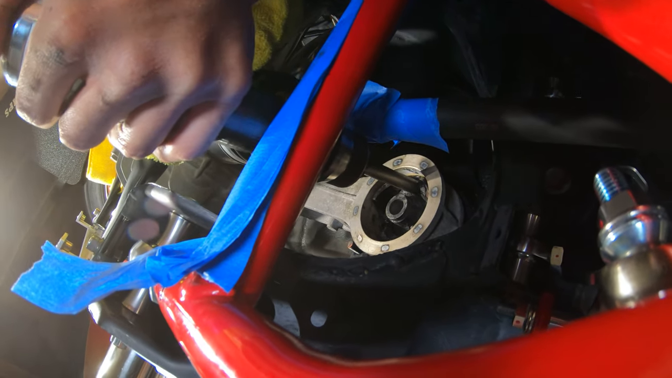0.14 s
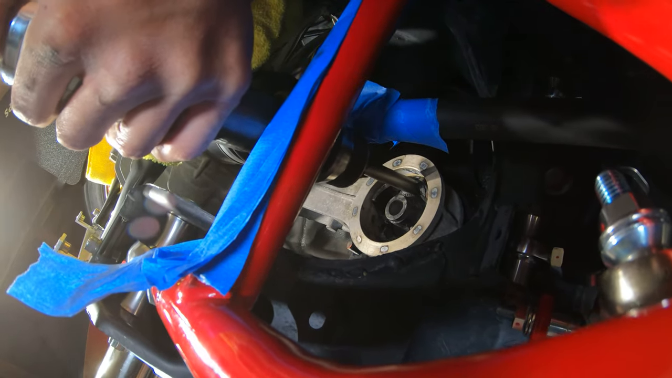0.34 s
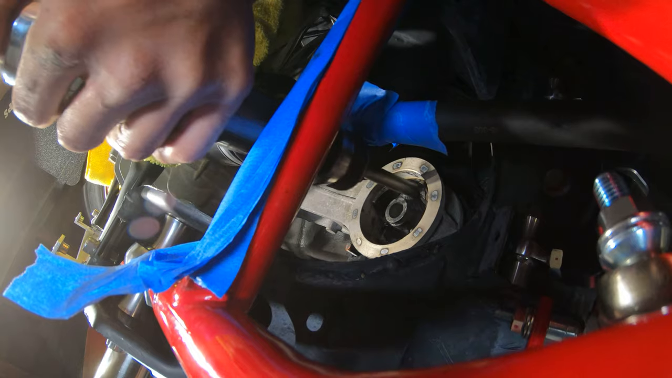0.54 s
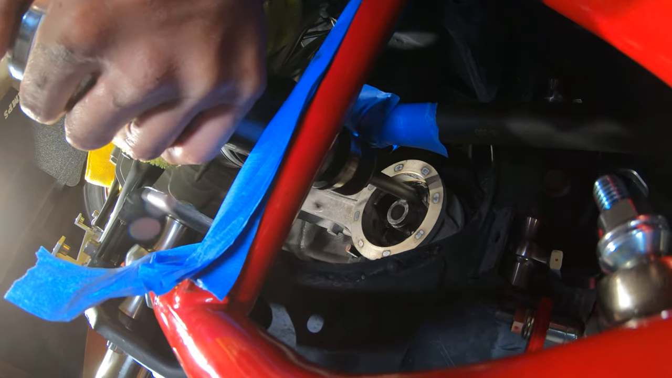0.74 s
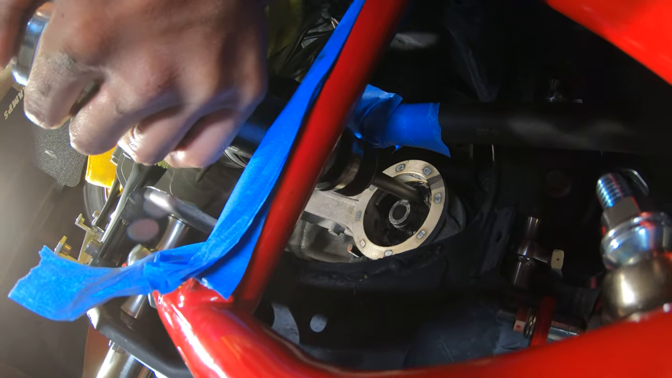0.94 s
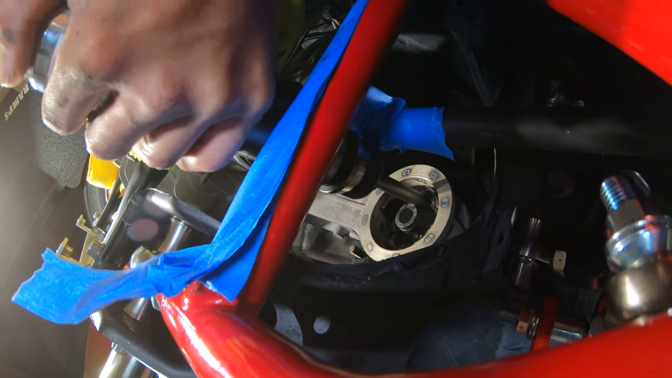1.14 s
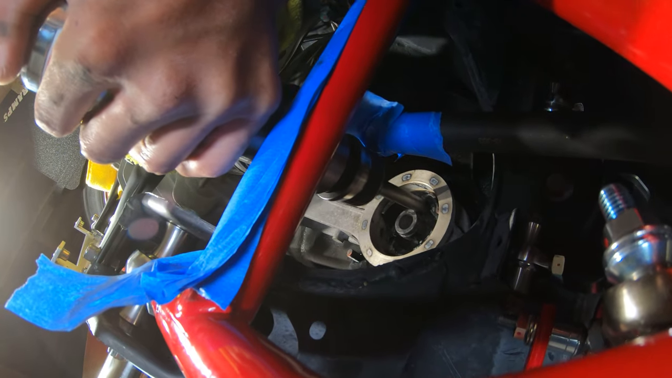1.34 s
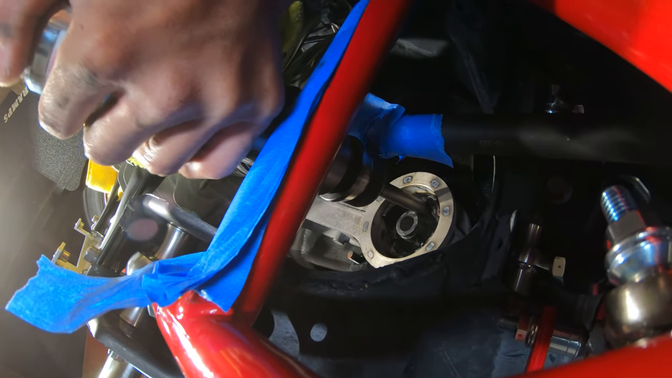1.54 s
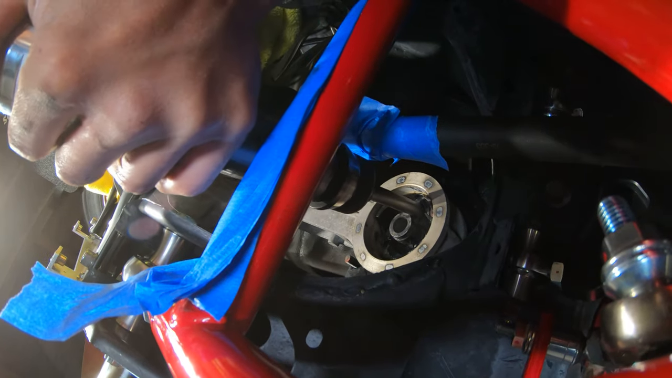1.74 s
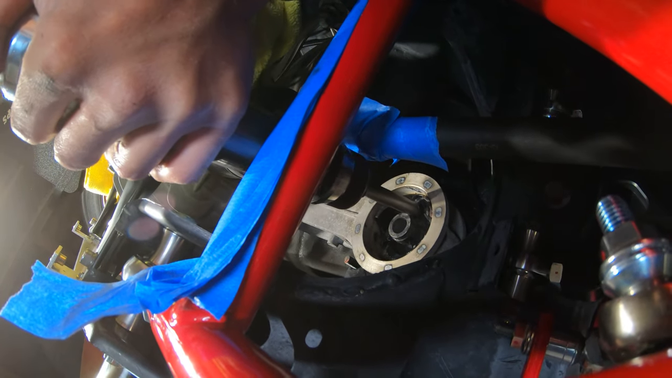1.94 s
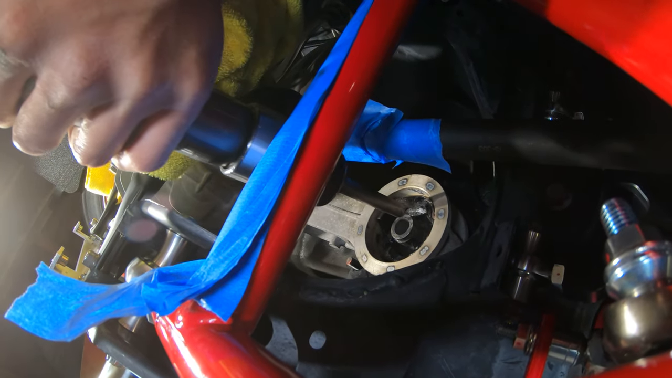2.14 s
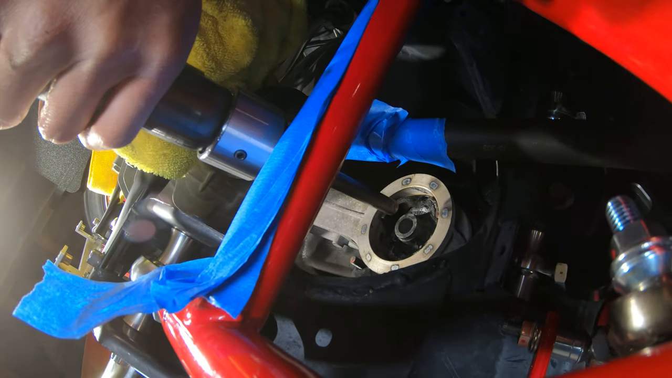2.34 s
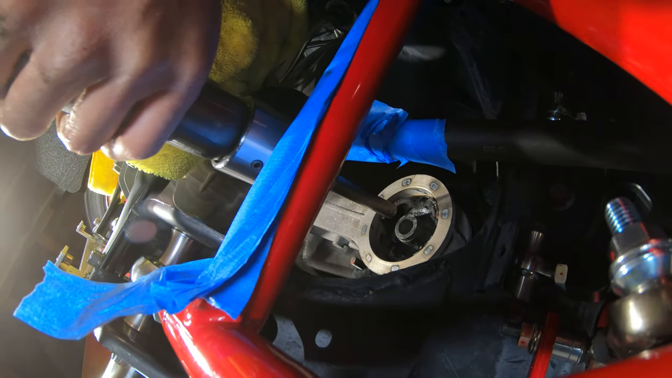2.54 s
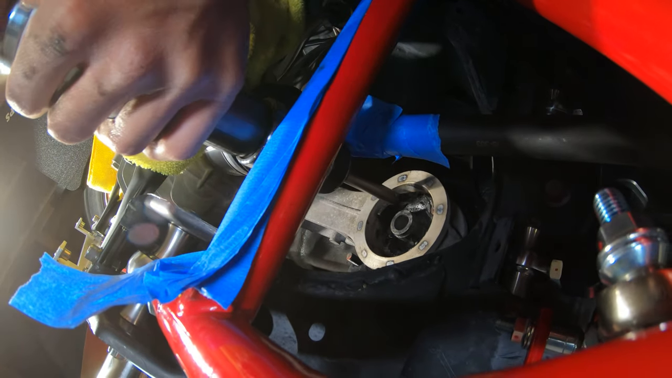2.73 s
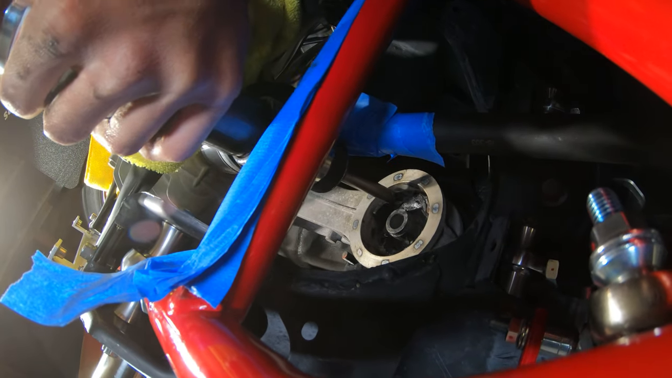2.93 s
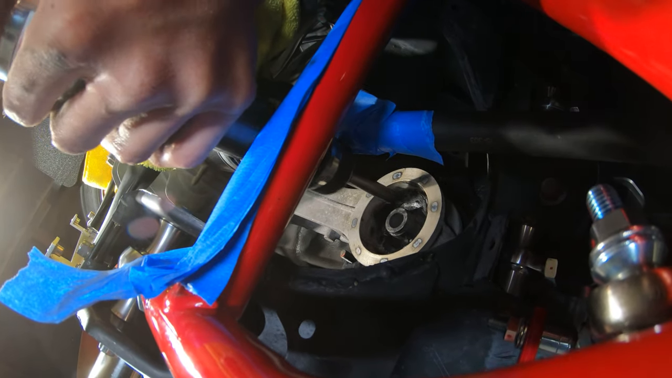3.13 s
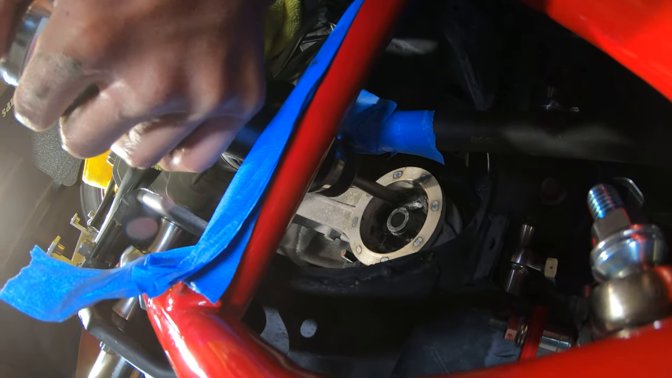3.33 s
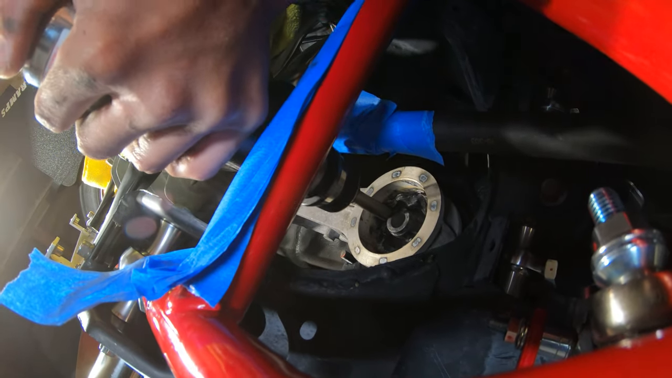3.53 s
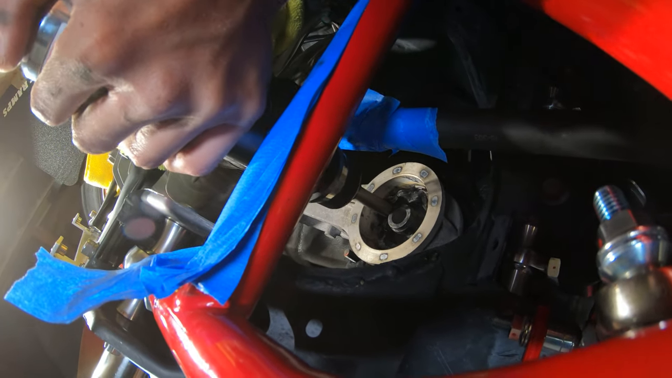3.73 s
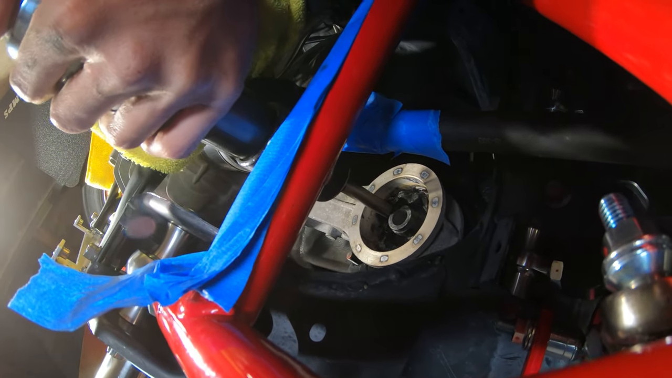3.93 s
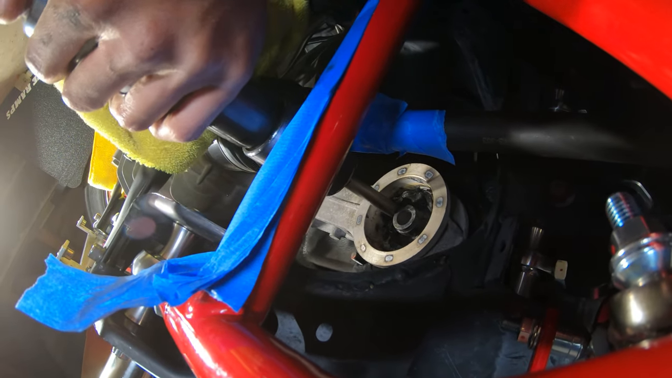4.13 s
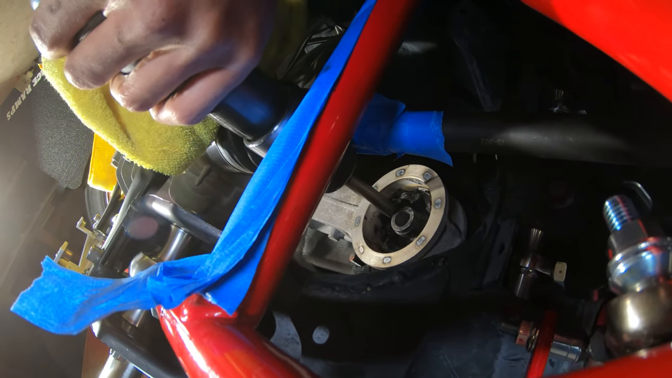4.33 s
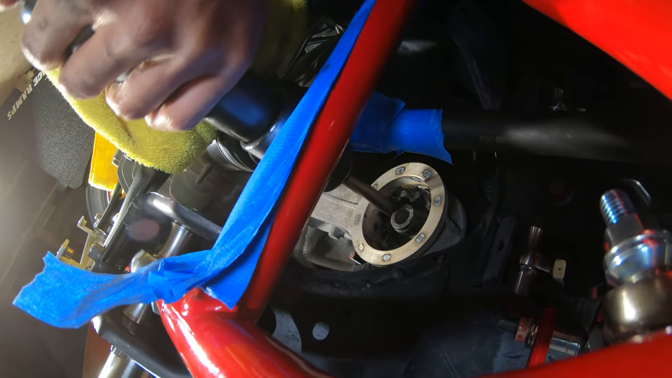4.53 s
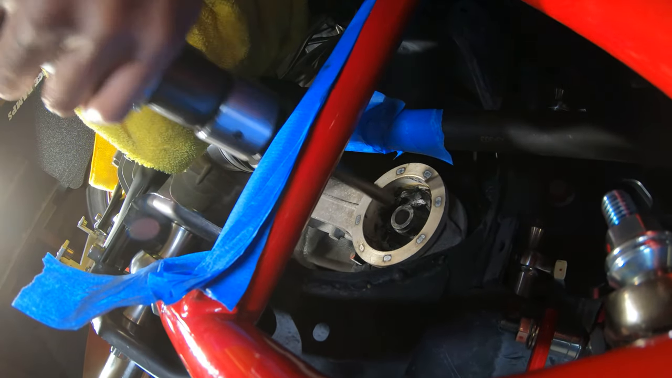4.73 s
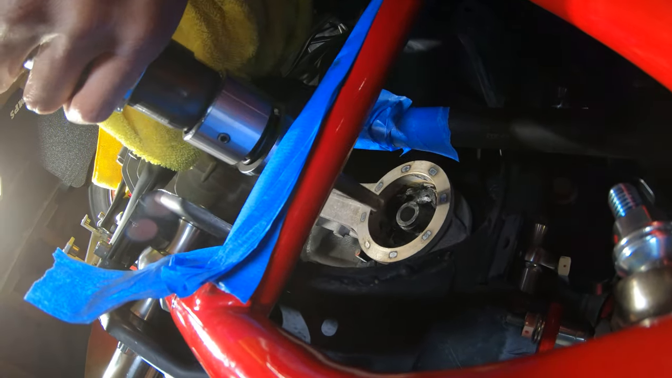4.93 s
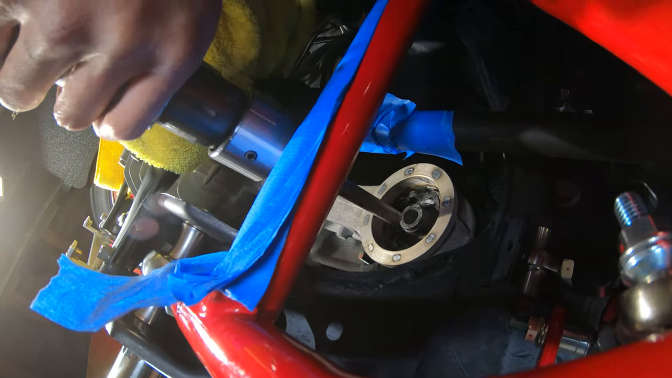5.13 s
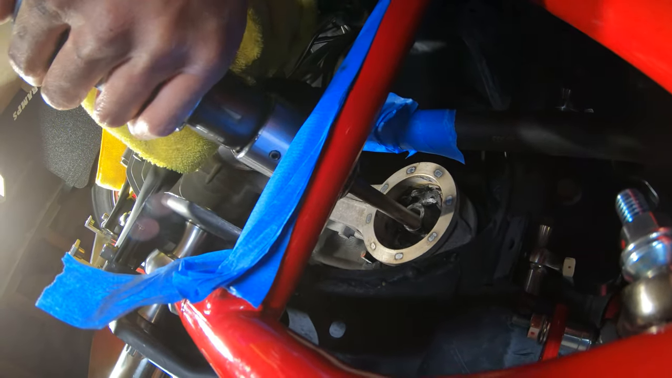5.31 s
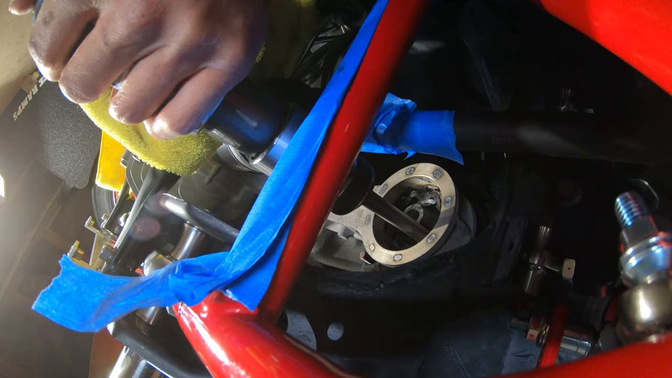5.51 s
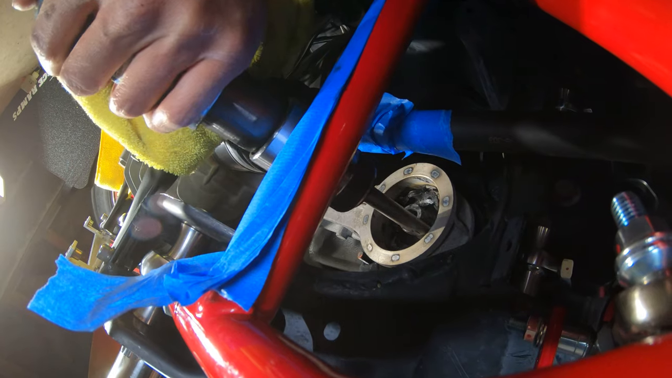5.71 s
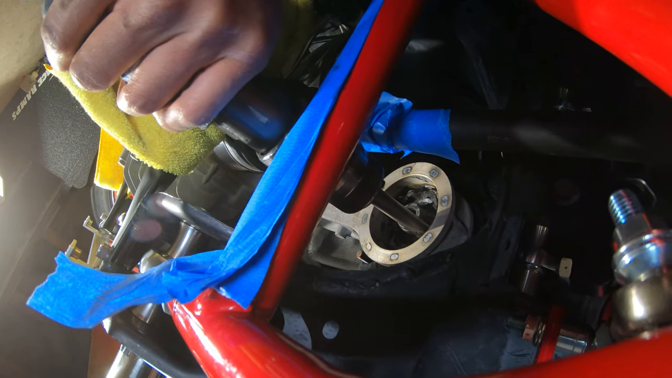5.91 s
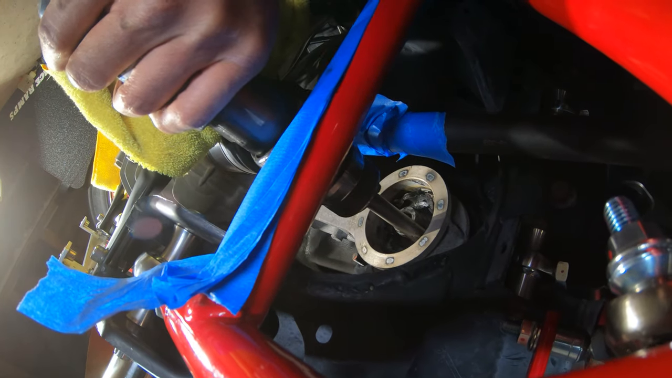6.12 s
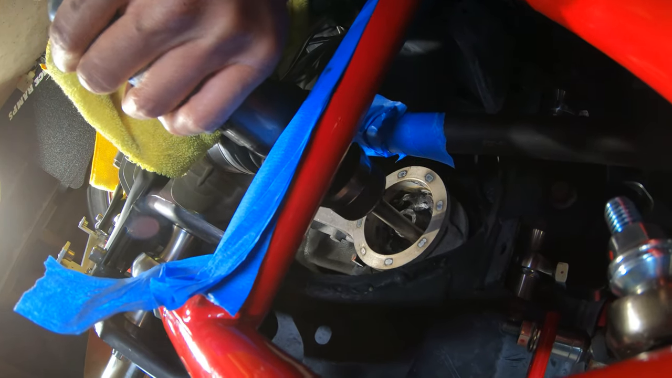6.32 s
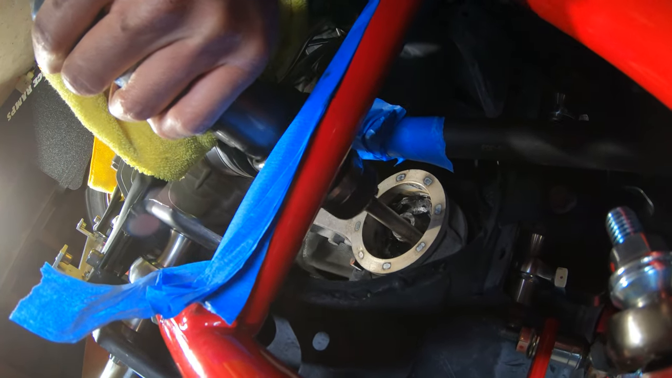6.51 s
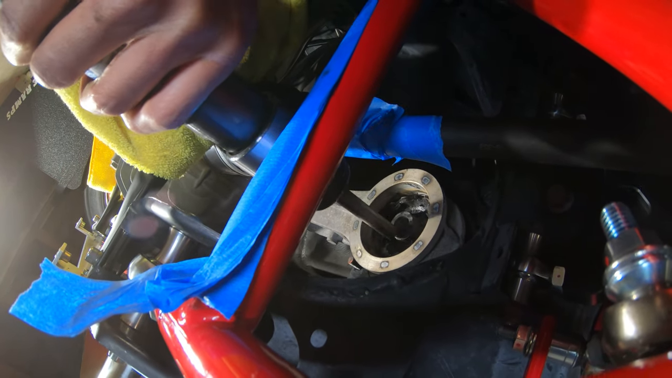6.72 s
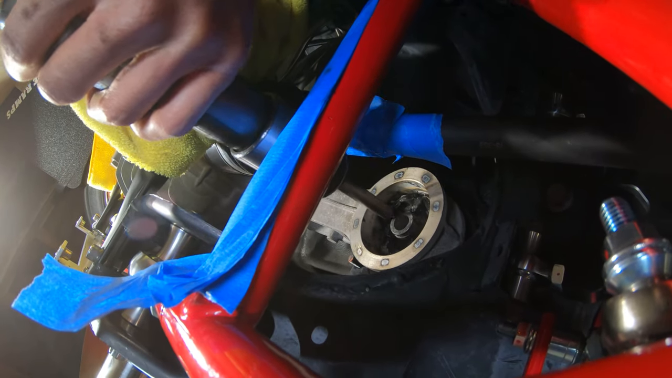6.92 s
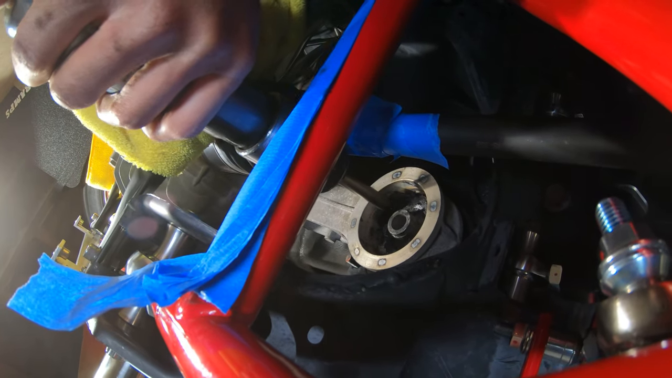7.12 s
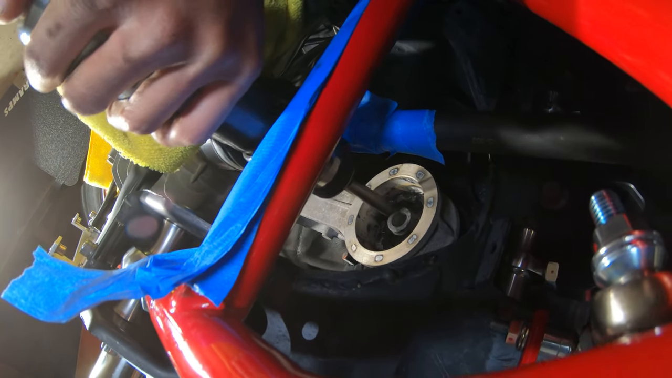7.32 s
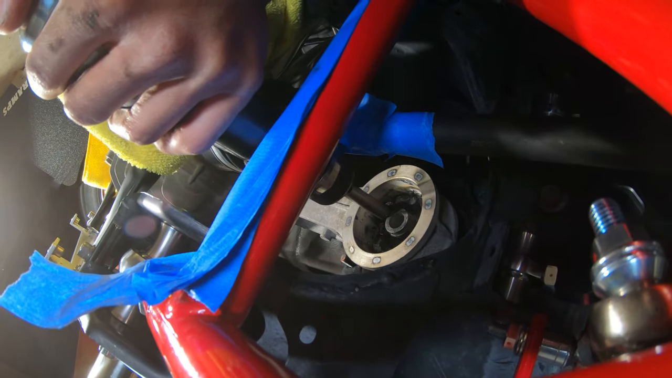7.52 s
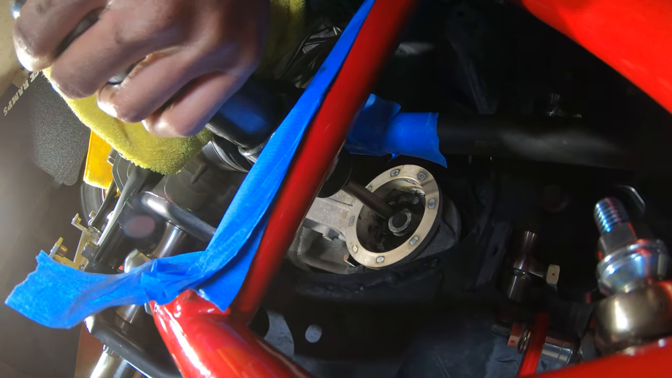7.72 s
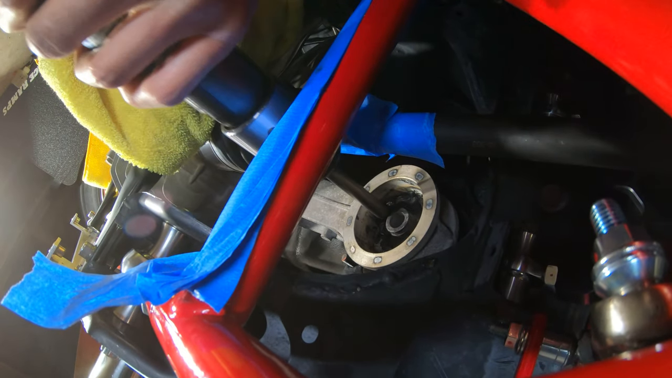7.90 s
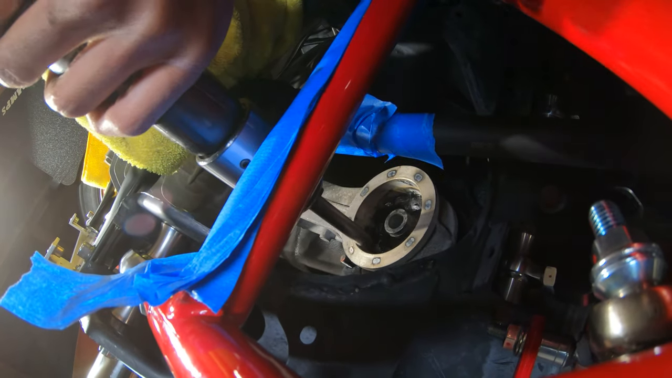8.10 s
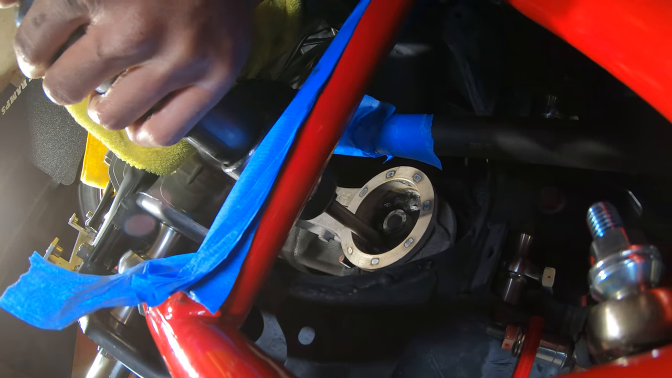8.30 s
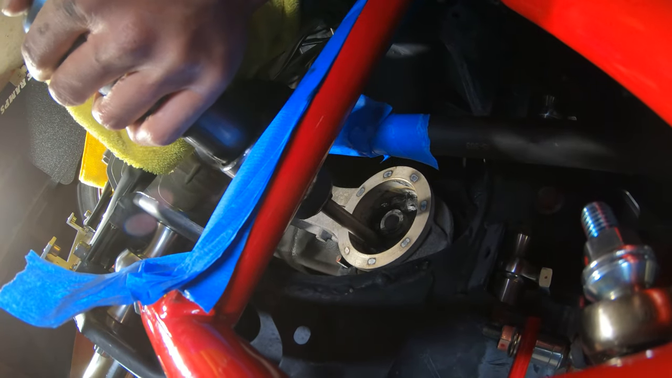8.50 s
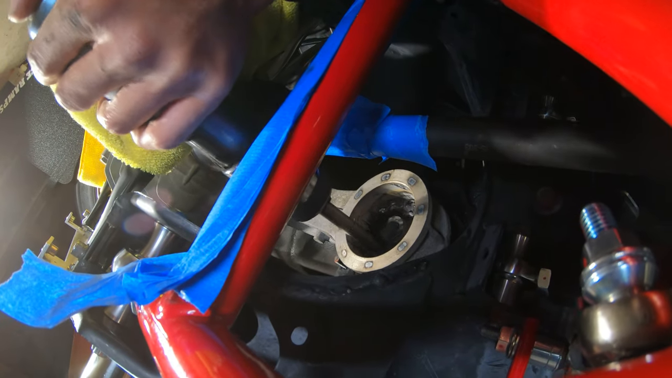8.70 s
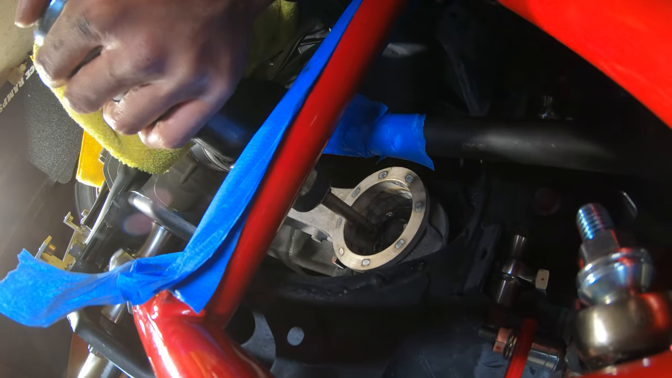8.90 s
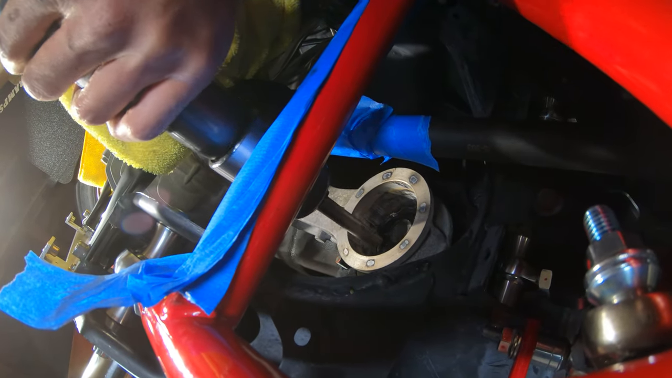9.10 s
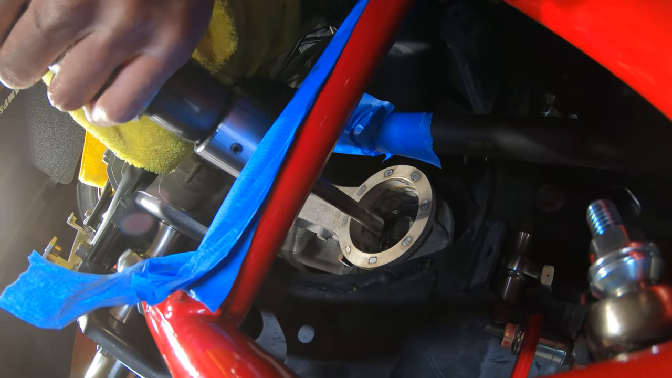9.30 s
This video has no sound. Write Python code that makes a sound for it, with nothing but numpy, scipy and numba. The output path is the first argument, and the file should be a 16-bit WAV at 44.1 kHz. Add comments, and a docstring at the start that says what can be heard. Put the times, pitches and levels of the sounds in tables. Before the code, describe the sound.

A compressor drones and rattles across a garage throughout, dipping under each loud sound and slowly swelling back. Close by, an air hammer drives a chisel against a steel mount, each burst a rapid metallic clatter with ringing steel, thumping puffs and hissing air. It fires briefly at 0.6 seconds, longer from 1.1 to 1.9, and again from 3.2 to 3.8, ending in an uneven bounce. Around 5 seconds the tool clinks and knocks lightly as it is reset. Three short bursts follow at about 6.3, 7.4 and 8.7 seconds, the last two stuttering, with small clinks and a knock around 8 and a bright clink just before 9. A faint, thin air leak whistles in the first second and again around 7 seconds. Faint breathy hoots of air trail the fourth and last bursts. The room adds a short echo.

```python
"""A compressor drones across a garage and leaking air whistles. Close by, an air hammer drives a chisel
against a steel mount under a car: each stroke thumps out a puff of air, rings the steel and hisses.
Three short bursts come first, the third ending in a bounce; then the tool clinks and knocks as it is reset.
Three more follow among a whistle, clinks and faint hoots, the last two bouncing again.
Throughout, the recorder's gain control ducks the drone at each burst and lets it swell back."""
import sys
import numpy as np
from scipy import signal
from scipy.fft import rfft, irfft
from scipy.io import wavfile
from scipy.ndimage import uniform_filter1d
from numba import njit

SR = 44100
rng = np.random.default_rng(int(sys.argv[2]) if len(sys.argv) > 2 else 0)


def unload_wav(signal):
    """Save mono or channel-first audio to the path in sys.argv[1] as 16-bit WAV at rate SR, clipped to [-1, 1]."""
    wavfile.write(
        sys.argv[1],
        SR,
        np.round(np.clip(np.atleast_2d(signal).T, -1, 1) * 32767).astype(np.int16),
    )


N = 412335
T = np.arange(N) / SR


def undb(db):
    """Decibels to gain."""
    return 10 ** (np.asarray(db) / 20)


def unit(x):
    """Scale to unit rms."""
    return x / np.sqrt(np.mean(x ** 2))


def noise():
    """White noise."""
    return rng.standard_normal(N)


def walk(rate_hz):
    """Smooth random drift, unit rms."""
    step = int(SR / rate_hz)
    return unit(uniform_filter1d(np.repeat(rng.standard_normal(N // step + 1), step)[:N], step))


def db_at(hz, points):
    """Read a spectrum on a log-frequency axis."""
    freq_hz, level_db = np.transpose(points)
    return np.interp(np.log(np.maximum(hz, 1)), np.log(freq_hz), level_db)


def colour(x, points):
    """Shape by (freq_hz, gain_db) points; white noise keeps its power."""
    gain = undb(db_at(np.arange(len(x) // 2 + 1) * SR / len(x), points))
    return irfft(rfft(x) * unit(gain), len(x))


def butter(x, edge_hz, kind="lowpass", order=2):
    """Butterworth filter."""
    return signal.sosfilt(signal.butter(order, edge_hz, kind, fs=SR, output="sos"), x)


def fade(t60_s):
    """Exponential decay, one second long."""
    return undb(-60 * T[:SR] / t60_s)


def gate(start_s, end_s, attack_s, release_s):
    """Rise from start_s, hold until end_s, then fall."""
    return np.clip((T - start_s) / attack_s, 0, 1) ** 2 * np.clip((end_s - T) / release_s + 1, 0, 1)


def ring(modes):
    """Unit-energy impulse response of damped resonances."""
    t = T[:SR]
    response = sum(undb(db) * width_hz * np.exp(-np.pi * width_hz * t) * np.cos(2 * np.pi * hz * t)
                   for hz, width_hz, db in modes)
    return response / np.linalg.norm(response)


def scatter(t60_s):
    """Unit-energy cloud of fading reflections."""
    response = rng.standard_normal(SR) * fade(t60_s)
    return response / np.linalg.norm(response)


def through(x, response):
    """Convolve with an impulse response."""
    return signal.fftconvolve(x, response)[:N]


def impulses(times_s, sizes):
    """Single-sample kicks."""
    return np.bincount(np.round(times_s * SR).astype(int), sizes, N)[:N]


# garage air spectrum: freq_hz, density_db
WASH_SPECTRUM = [(28, -12), (67, -14), (102, -19), (305, -16.5), (360, -19.5), (530, -17), (660, -27.5),
                 (900, -23), (1200, -24), (1870, -32.5), (3200, -23.5), (4000, -31), (8500, -37),
                 (10000, -37), (15500, -54)]

def room_tone(wash_db=-37, hum_hz=163, hum_db=-42):
    """The garage's airy wash and a wavering hum."""
    wash = undb(wash_db + 0.17 * walk(6.7)) * colour(noise(), WASH_SPECTRUM)
    hum = undb(hum_db + 2 * walk(4)) * np.sin(2 * np.pi * hum_hz * T)
    return wash + hum


# air leaks: start_s, end_s, start_level_db
LEAK_SPANS = [(0, .56, -41.5), (0.932, 1.06, -31), (6.66, 7.312, -32)]

def leak_whistle(pitch_hz=1443, fade_db_per_s=12.5, edge_s=0.067):
    """Leaking air whistles between pulls and dies away."""
    tone = np.sin(2 * np.pi * np.cumsum(pitch_hz * (1 + 0.00084 * walk(28))) / SR)
    level = sum(gate(start - edge_s, end, edge_s, edge_s) * undb(db - fade_db_per_s * np.abs(T - start))
                for start, end, db in LEAK_SPANS)
    return tone * level * undb(walk(15))


# strong pump lines: shaft_order, rms_db
PUMP_LINES = [(1, -41.5), (2, -27), (3, -44), (4, -40.5), (5, -53.5), (7, -43.5), (9, -44.5), (10, -47),
              (11, -43), (19, -43), (20, -50.5), (22, -51), (25, -49), (26, -51), (27, -48), (29, -46.5),
              (32, -44.5), (37, -53), (42, -47), (45, -65), (46, -52.5), (47, -48), (85, -48), (115, -53.5)]
# envelope of the weaker lines: freq_hz, rms_db
RATTLE_SPECTRUM = [(160, -41), (250, -49.5), (400, -63), (600, -51), (850, -56.5), (1000, -58),
                   (1250, -53.5), (1550, -60.5), (2150, -66), (2480, -55), (2800, -69), (3600, -75)]
# valve hiss resonances: freq_hz, width_hz, relative_db
VALVE_MODES = [(2450, 300, -1.5), (2510, 80, 3.5), (3020, 150, -22), (4400, 620, -5.5), (5300, 220, -8.5),
               (6670, 350, -13.5)]
# high whine: time_s, amplitude_db
WHINE_LEVELS = [(.25, -40), (2.6, -42), (5.4, -41), (6.05, -39.5), (7.05, -36.5), (7.9, -42), (9.3, -40.5)]

def compressor(shaft_hz=28.425, whine_order=90, hiss_db=-43, throb=0.11, spread_db=1.0, waver_db=1.0):
    """A two-cylinder pump rattles every turn; its valves hiss twice a turn and one high line whines."""
    turns = np.cumsum(shaft_hz * (1 + 0.000567 * walk(3))) / SR
    orders = np.arange(1, 126)
    lines_db = db_at(orders * shaft_hz, RATTLE_SPECTRUM) - spread_db * rng.standard_normal(len(orders))
    for order, rms_db in PUMP_LINES:
        lines_db[round(order) - 1] = rms_db
    lines = undb(lines_db) * np.exp(2j * np.pi * rng.random(len(orders)))
    size = 4096
    one_turn = irfft(np.append(0, lines), size) * size / np.sqrt(2)
    drone = np.interp(turns, np.arange(size) / size, one_turn, period=1)
    hiss = through(noise(), ring(VALVE_MODES))
    hiss = unit(colour(hiss, [(1000, -14), (2200, -1), (7500, 6.5), (15000, -21)]))
    whine_db = np.interp(T, *np.transpose(WHINE_LEVELS)) + waver_db * walk(2.9)
    whine = undb(whine_db) * np.sin(2 * np.pi * whine_order * turns)
    return drone + whine + undb(hiss_db) * hiss * (1 + throb * np.cos(4 * np.pi * turns))


# room standing waves and a body panel: freq_hz, width_hz, relative_db
BOOM_MODES = [(85, 3, -18), (106.7, 2, 9), (129, 6.4, 6), (170, 4.6, -14), (630, 6, 6)]

def garage(x, near_db=-13, near_t60_s=0.26, far_db=-23, far_t60_s=0.95, boom_gain_db=-26):
    """Add quick reflections from the car's underside, the room's longer tail and its low boom."""
    near = colour(through(x, scatter(near_t60_s)), [(60, 6), (300, -4), (1000, -3), (4000, -4)])
    far = colour(through(x, scatter(far_t60_s)),
                 [(50, 9), (120, 12.5), (400, 8), (2000, 2), (5500, 3), (10000, -5), (15000, -34)])
    boom = butter(through(x, ring(BOOM_MODES)), 30, "lowpass", order=1)
    return x + undb(near_db) * near + undb(far_db) * far + undb(boom_gain_db) * boom


# hollow tones: start_s, length_s, from_hz, to_hz, level_db
HOOT_GLIDES = [(6.55, .1, 633, 622, -29), (8.945, .08, 882, 578, -31)]

def hoots(breathiness=0.57):
    """A faint, breathy, falling tone trails two of the bursts."""
    out = np.zeros(N)
    for start_s, length_s, from_hz, to_hz, level_db in HOOT_GLIDES:
        pitch_hz = np.interp(T, [start_s, start_s + length_s], [from_hz, to_hz])
        level = undb(level_db) * gate(start_s, start_s + length_s, attack_s=0.011, release_s=.03)
        out += level * (1 + breathiness * walk(120)) * np.sin(2 * np.pi * np.cumsum(pitch_hz) / SR)
    return out


# free ring of the chisel: freq_hz, width_hz, relative_db
CHISEL_MODES = [(4280, 25, -3), (4985, 20, -3), (5900, 25, -4), (7550, 30, -5), (8463, 25, -5),
                (10950, 45, 3), (13150, 45, -1)]

def contact(centre_hz, t60_s, ring_db=None, breadth=0.53):
    """A short scrape: the touched part answers in one broad band, and the chisel may ring."""
    band = ring([(centre_hz, breadth * centre_hz, 0)])
    body = signal.fftconvolve(band, band)[:SR]  # twice, for steep sides
    body = body / np.linalg.norm(body)
    if ring_db is not None:
        body = body + undb(ring_db) * ring(CHISEL_MODES)
    return signal.fftconvolve(rng.standard_normal(SR) * fade(t60_s), body)[:SR]


# tip on the mount: start_s, level_db, centre_hz, ring_db
TIP_CLINKS = [(4.92, -23, 7600, -28), (4.963, -25, 4470, -8), (4.982, -26.5, 4700, 2.5),
              (5.721, -29.5, 4700, -16), (7.115, -29.5, 3750, -23), (7.756, -26, 4500, -20),
              (7.787, -28, 6040, -8), (8.058, -29, 4770, -12), (8.107, -23, 4350, -22),
              (8.181, -25, 4780, -30), (8.231, -28, 5000, -21), (8.942, -11, 5170, -2),
              (8.952, -8.5, 5700, -4)]
# tool body on the frame: start_s, level_db, centre_hz
BODY_KNOCKS = [(4.919, -21, 1260), (5.504, -25, 2250), (8.109, -21.5, 380)]

def tool_reset(clink_t60_s=0.046, knock_t60_s=.14, frame_hz=550, frame_db=-5.5):
    """The tip clinks brightly; the body knocks and the frame answers hollowly."""
    sounds = [(s, db, contact(hz, clink_t60_s, ring_db)) for s, db, hz, ring_db in TIP_CLINKS]
    sounds += [(s, db, contact(hz, knock_t60_s) + undb(frame_db) * contact(frame_hz, knock_t60_s))
               for s, db, hz in BODY_KNOCKS]
    out = np.zeros(N + SR)
    for start_s, level_db, sound in sounds:
        start = int(start_s * SR)
        out[start:start + SR] += undb(level_db) * sound
    return out[:N]


def buffet(starts_s, ends_s):
    """Spent air rumbles on the microphone during each burst."""
    gusts = sum(gate(start, end, attack_s=0.014, release_s=0.044) for start, end in zip(starts_s, ends_s))
    return gusts * colour(noise(), [(10, -49), (28, -1), (62, 5), (130, 4), (600, -58)])


# rush of spent air: freq_hz, density_db
AIR_SPECTRUM = [(25, 22.5), (70, -17), (200, 12), (500, 4), (1400, 0.5), (3000, 2.5), (6500, 2.5),
                (8200, -0.5), (10200, 0.5), (15500, -10.5)]

def exhaust_hiss(kicks, opens_s, closes_s, pull, puff_db=-10, vent_s=0.013, leak_db=-17,
                 onset_db=-3.5, build_s=0.18, dip_db=-2.5):
    """The port vents a puff each stroke; air leaks past the piston while the trigger is held."""
    puffs = through(kicks, np.exp(-(T[:SR] / vent_s) ** 2))
    leak = sum(gate(start, end, attack_s=0.042, release_s=0.044) for start, end in zip(opens_s, closes_s))
    held_s = np.clip(T, opens_s[pull], closes_s[pull]) - opens_s[pull]
    flow_db = onset_db * np.exp(-held_s / build_s)
    flow_db += dip_db * gate(3.53, 3.68, attack_s=.06, release_s=0.11)  # just ahead of the first bounce
    return (undb(puff_db) * puffs + undb(leak_db) * leak) * undb(flow_db) * colour(noise(), AIR_SPECTRUM)


# exhaust port snap: freq_hz, width_hz, relative_db
SNAP_MODES = [(720, 180, -36.5), (2080, 1100, 16)]
# exhaust puff in the wheel well: freq_hz, width_hz, relative_db
THUMP_MODES = [(96.1, 10, 4), (161.5, 26.4, 6), (187, 114, -0.5), (268, 44, -4), (482.5, 80, 2.5),
               (610.6, 42, -1.5), (690, 49, -3.5), (773, 66, -2), (900, 91, -8.5), (986, 56, -4)]

def exhaust_pulses(times_s, push, thump_db=25.5, thump_band_hz=(65, 1300), snap_db=15, snap_lag_s=.00044):
    """Each stroke snaps the port open and thumps air into the wheel well."""
    thump = butter(through(impulses(times_s, push), ring(THUMP_MODES)), thump_band_hz, "bandpass")
    snap = butter(through(impulses(times_s + snap_lag_s, -push), ring(SNAP_MODES)), 3500)
    return undb(thump_db) * thump + undb(snap_db) * snap


# chisel, barrel and mount: freq_hz, width_hz, relative_db
STEEL_MODES = [(1640, 26, -15), (1830, 50, -27), (2045, 35, 11.5), (2200, 120, 3.5), (2580, 110, -24),
               (2886, 140, 4.5), (3004, 130, 9.5), (4250, 150, 5.5), (4990, 210, 2.5), (6100, 300, -5.5)]
# metal clatter: freq_hz, density_db
CLATTER_SPECTRUM = [(200, -33), (600, -7), (1050, -25), (1350, 9), (1750, 7), (2080, 9), (2450, -27),
                    (3000, 14.5), (3700, -11), (5200, 4), (8000, -6.5), (10200, 5), (15500, -22)]

def struck_steel(strikes, ring_db=15, clatter_db=12.5, clatter_t60_s=0.07, chatter=0.083, creep_rad=0.6):
    """The steel rings and clatters; brief chatter after each strike blurs the upper harmonics."""
    strikes = strikes + chatter * noise() * through(strikes, fade(0.014))
    ringing = butter(through(strikes, ring(STEEL_MODES)), 7000)
    seat_rad = creep_rad * walk(4)  # the creeping tip shifts the clatter between two colours
    clatter = sum(through(strikes * share, scatter(clatter_t60_s))
                  for share in (np.cos(seat_rad), np.sin(seat_rad)))
    return undb(ring_db) * ringing + undb(clatter_db) * colour(clatter, CLATTER_SPECTRUM)


def strokes(start_s, end_s, length, stroke_s=.0208):
    """Blow times after start_s, up to end_s; length(k) is the relative length of stroke k."""
    elapsed = np.cumsum(length(np.arange(round((end_s - start_s) / stroke_s))))
    return start_s + (end_s - start_s) * elapsed / elapsed[-1]


# piston timing per burst: first_blow_s, at_speed_s, even_until_s, last_blow_s, sag_ratio
PISTON_RUNS = [(.5836, .6049, .7674, .7951, .07), (1.1089, 1.1305, 1.8228, 1.8489, .044),
               (3.2182, 3.2413, 3.6526, 3.7619, .073), (6.2863, 6.3112, 6.4728, 6.4959, .03),
               (7.3528, 7.3743, 7.4552, 7.5625, .06), (8.7111, 8.7336, 8.7537, 8.8953, .06)]
# chisel off its seat: start_s, end_s, strokes_per_limp
CHISEL_BOUNCES = [(3.6526, 3.7373, 2), (7.4552, 7.5358, 4), (8.7537, 8.8729, 3)]

def piston_blows(firsts_db, lasts_db, sag_strokes=8, stall_db=-2.5, limp=.1, bounce_db=3.5):
    """Blows as time_s, push_db, hit_db: runs slow as hose pressure sags; bounces limp long and short."""
    rows = []
    for timing, first_db, last_db in zip(PISTON_RUNS, firsts_db, lasts_db):
        first_s, at_speed_s, even_until_s, last_s, sag = timing
        run_s = strokes(at_speed_s, even_until_s, lambda k: 1 - sag * np.exp(-k / sag_strokes))
        rows.append((first_s, first_db, first_db))
        rows.append((last_s, last_db + stall_db, last_db))  # less air behind the last blow
        rows += [(s, 0, 0) for s in (at_speed_s, *run_s)]
    for start_s, end_s, cycle in CHISEL_BOUNCES:
        run_s = strokes(start_s, end_s, lambda k: np.where(k % cycle < cycle / 2, 1 + limp, 1 - limp))
        rows += [(s, 0, bounce_db * (s - start_s) / (end_s - start_s)) for s in run_s]
    return np.transpose(rows)


# trigger pulls, relative levels:
# close_s, steel_db, thump_db, hiss_db, gust_db, first_blow_db, last_blow_db
TRIGGER_PULLS = [(.8, 1.5, 1, 1.5, 0.5, 2, 0), (1.854, 3.5, -1, 2.5, 2.5, 2, -1),
                 (3.728, -0.5, -1, 4.5, 1, -1.5, -3.5), (6.482, -1, -1, 0.5, -1, -3, -1),
                 (7.544, -3.5, -0.5, 3.5, 3, -1, -8), (8.919, -5.5, -2.5, 1.5, -1, 0, 2.5)]

def air_hammer(valve_lead_s=.026, strike_lag_s=.0012, slip_s=.00005, uneven_db=0.73, buffet_db=-14):
    """The piston vents air and strikes the chisel, which seats a little differently each time."""
    closes_s, steel_db, thump_db, hiss_db, gust_db, firsts_db, lasts_db = np.transpose(TRIGGER_PULLS)
    starts_s = np.array(PISTON_RUNS)[:, 0]
    opens_s = starts_s - valve_lead_s
    times_s, push_db, hit_db = piston_blows(firsts_db, lasts_db)
    push_jitter, time_jitter, hit_jitter = rng.standard_normal((len(times_s), 3)).T
    blow_pull = np.maximum(np.searchsorted(opens_s, times_s) - 1, 0)
    sample_pull = np.maximum(np.searchsorted(opens_s, T) - 1, 0)
    pulses = exhaust_pulses(times_s, undb(push_db + thump_db[blow_pull] + .5 * push_jitter))
    force = undb(hit_db + steel_db[blow_pull] + uneven_db * hit_jitter)
    steel = struck_steel(impulses(times_s + strike_lag_s + slip_s * time_jitter, force))
    kicks = impulses(times_s + strike_lag_s, undb(hit_db))
    hiss = undb(hiss_db[sample_pull]) * exhaust_hiss(kicks, opens_s, closes_s, sample_pull)
    rumble = undb(buffet_db + gust_db[sample_pull]) * buffet(starts_s, closes_s)
    return pulses + steel + hiss + rumble


def scene():
    """The tool close by, the compressor further off."""
    tool = garage(air_hammer() + tool_reset() + hoots())
    return (tool + compressor() + room_tone() + leak_whistle())[None]


@njit
def duck(over_db, start_db, attack_s, release_s):
    """Gain reduction in dB: rises fast to meet any excess, ebbs slowly."""
    out, cut_db = np.empty(len(over_db)), start_db
    for i in range(len(over_db)):
        if over_db[i] > cut_db:
            cut_db += (over_db[i] - cut_db) / (attack_s * SR)
        else:
            cut_db -= cut_db / (release_s * SR)
        out[i] = cut_db
    return out


# microphone response, treble falling in two steps: freq_hz, relative_db
MIC_RESPONSE = [(100, 2), (10200, -2), (11600, -11), (14200, -9), (15500, -20)]

def record(dry, threshold_db=-20.0, makeup_db=4.0, start_cut_db=12.0, attack_s=0.0078, release_s=1.845,
           ceiling=0.49, top_hz=15650):
    """Microphone colour, gain control with a short look-ahead, rounded peaks and a cut top."""
    sound = colour(dry[0], MIC_RESPONSE)
    power = uniform_filter1d(sound ** 2, size=300)
    over_db = 10 * np.log10(np.abs(power) + 1e-12) - threshold_db
    cut_db = duck(over_db, start_cut_db, attack_s, release_s)
    rounded = ceiling * np.tanh(sound * undb(makeup_db - cut_db) / ceiling)
    return signal.sosfilt(signal.ellip(10, .2, 80, top_hz, fs=SR, output="sos"), rounded)[None]


dry = scene()
out = record(dry)
unload_wav(out)
```